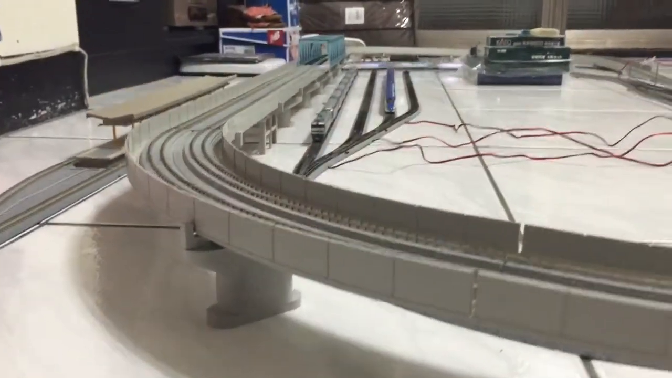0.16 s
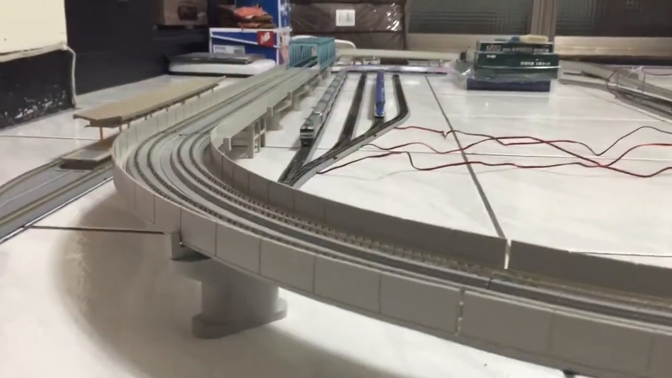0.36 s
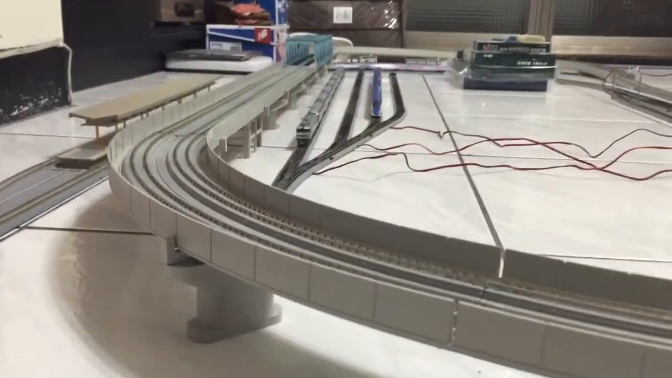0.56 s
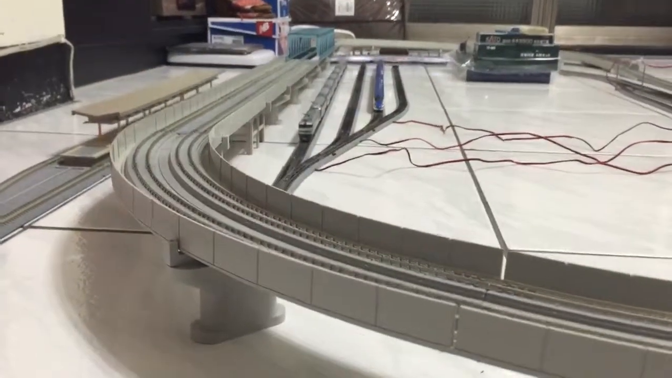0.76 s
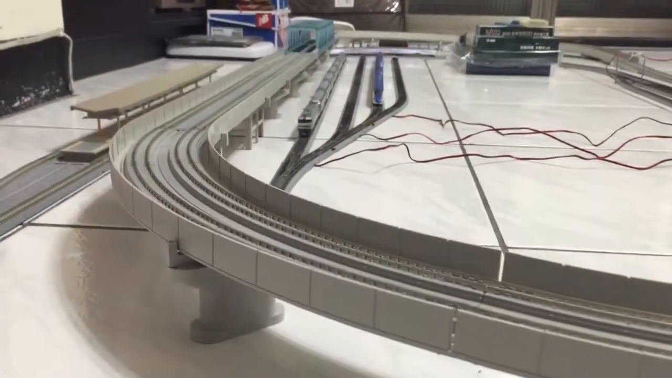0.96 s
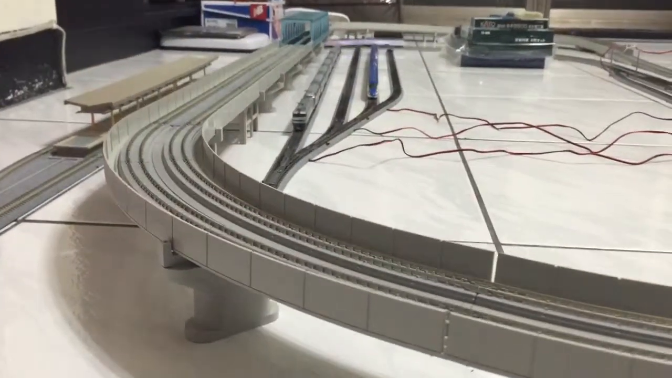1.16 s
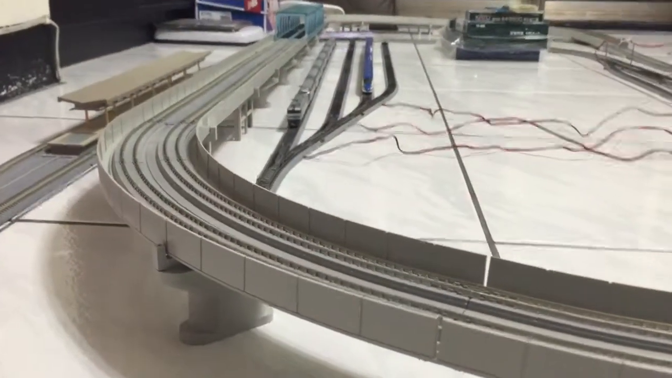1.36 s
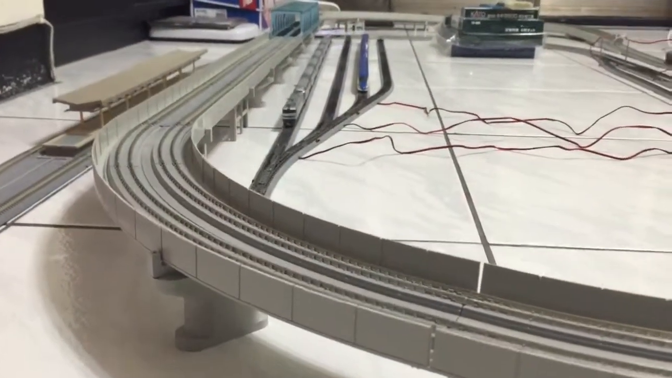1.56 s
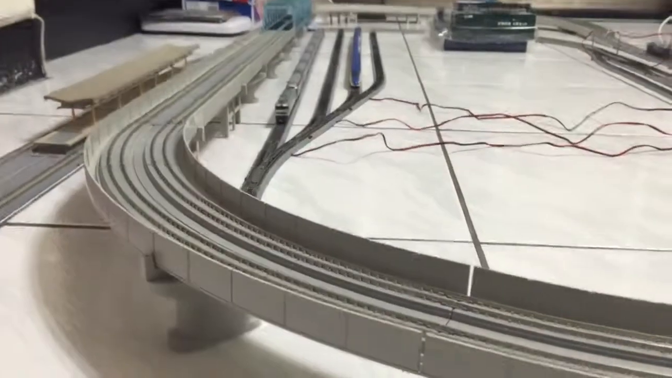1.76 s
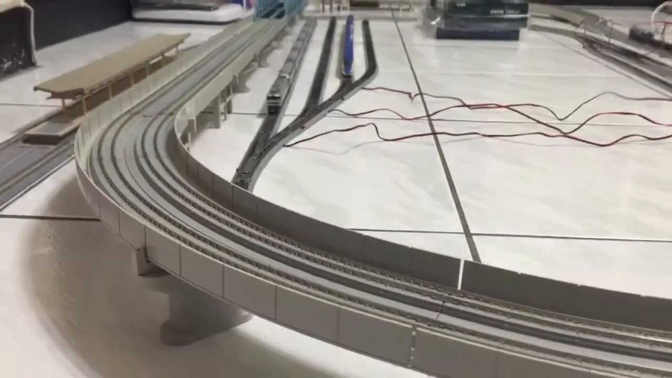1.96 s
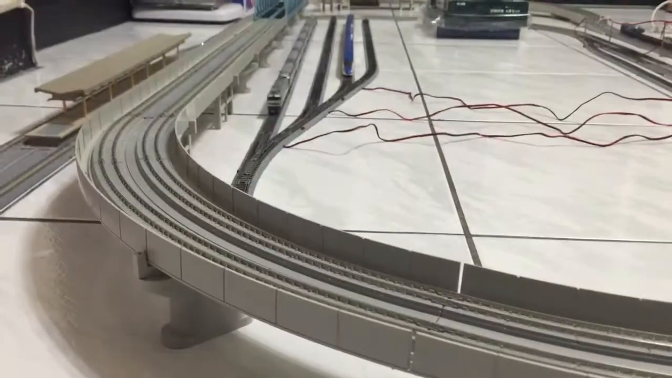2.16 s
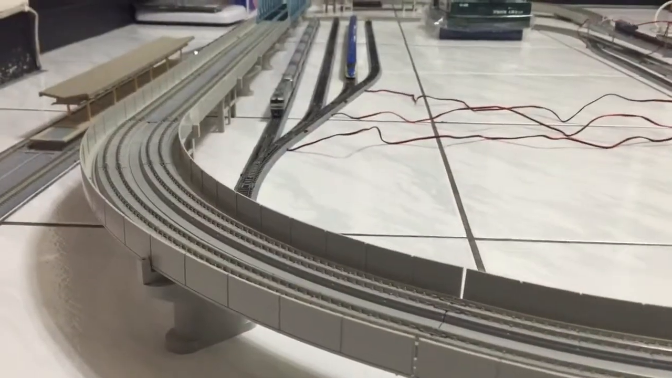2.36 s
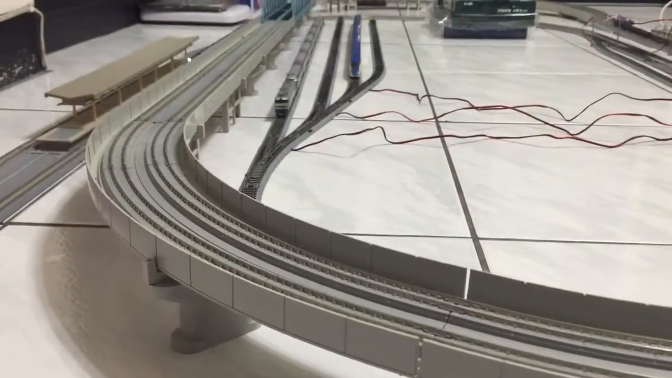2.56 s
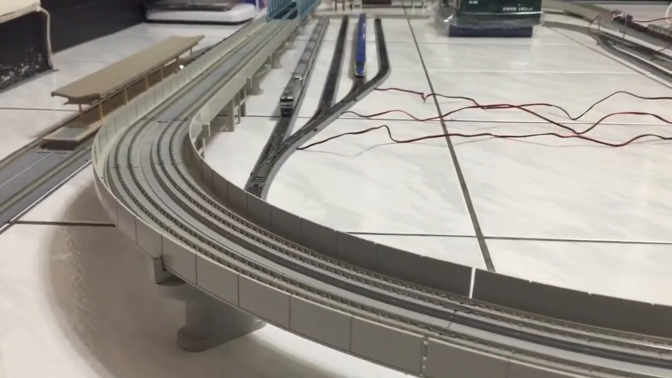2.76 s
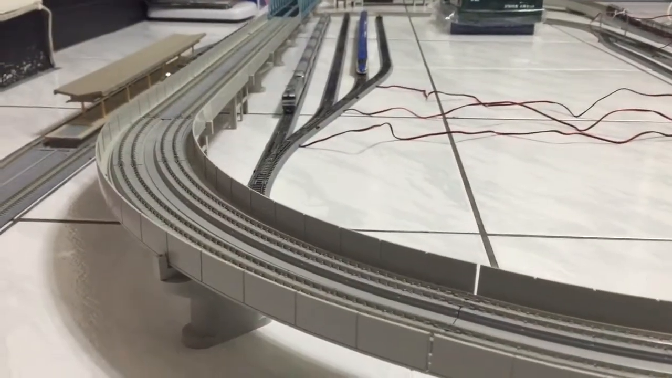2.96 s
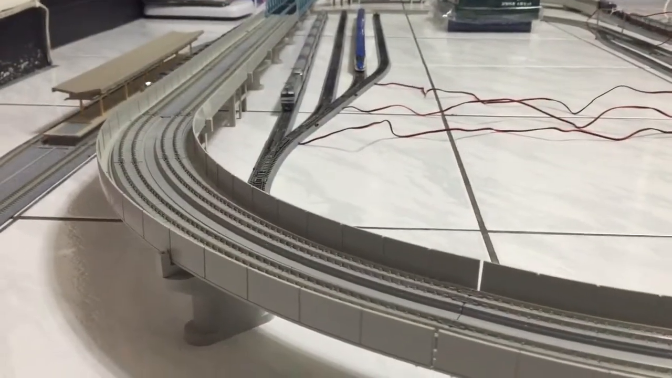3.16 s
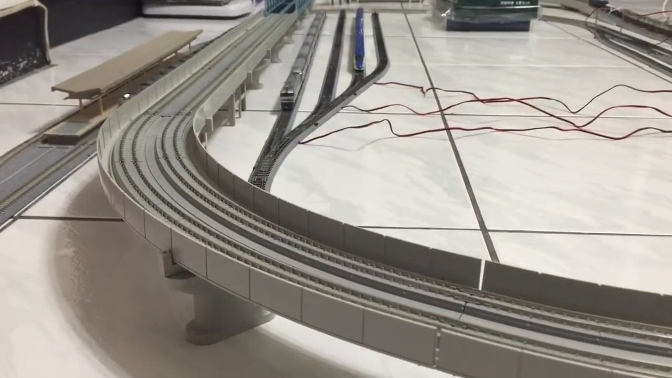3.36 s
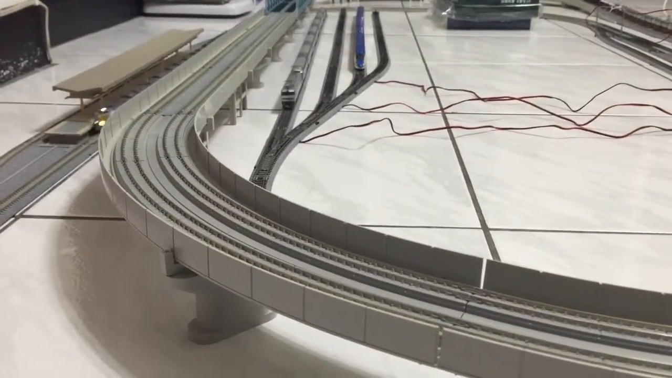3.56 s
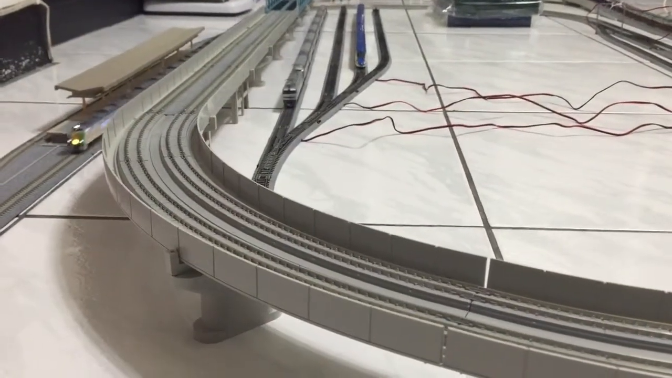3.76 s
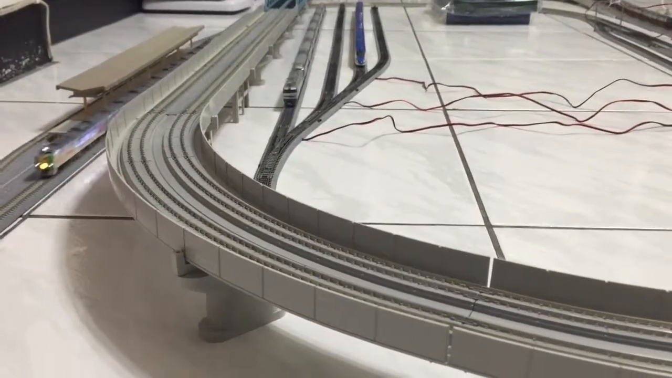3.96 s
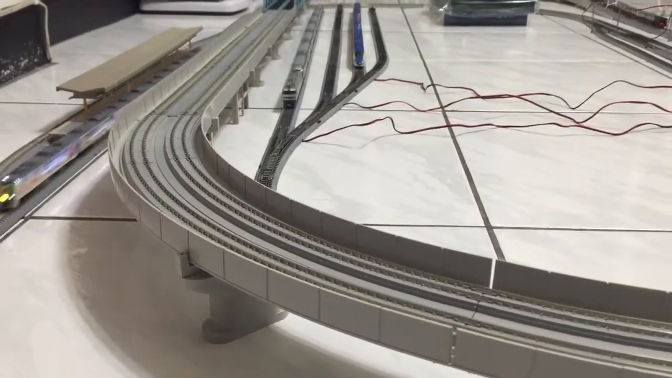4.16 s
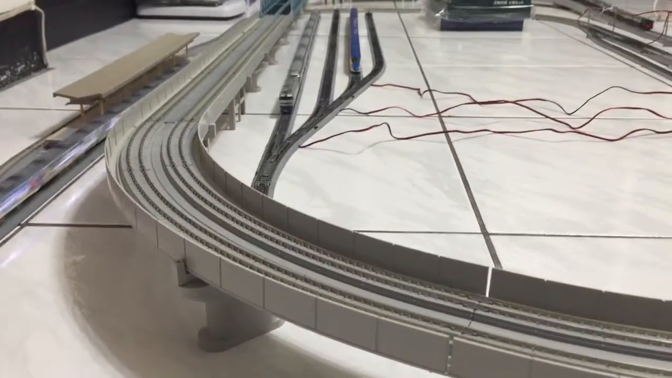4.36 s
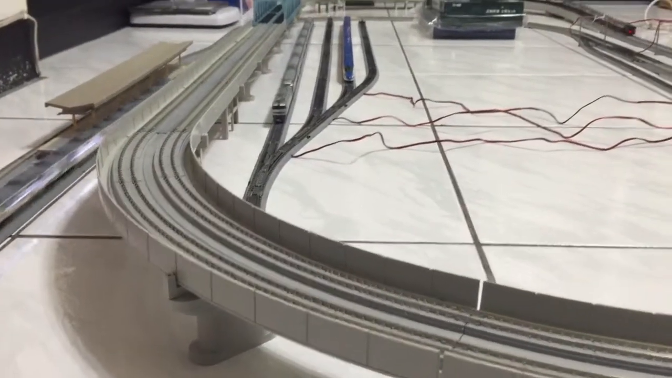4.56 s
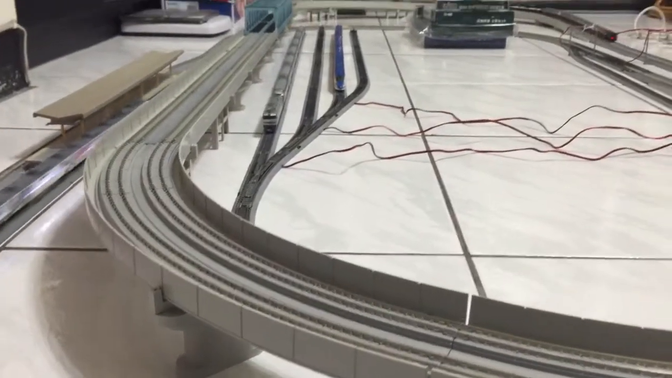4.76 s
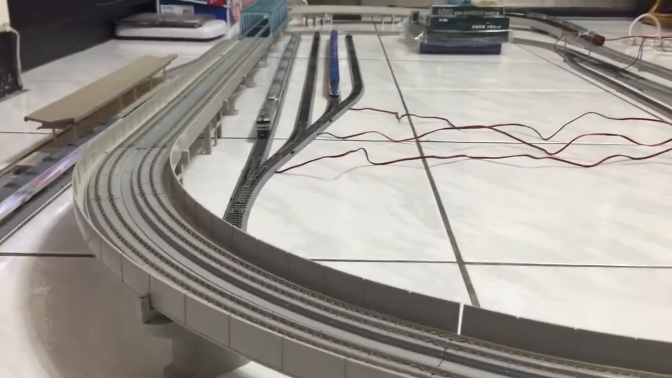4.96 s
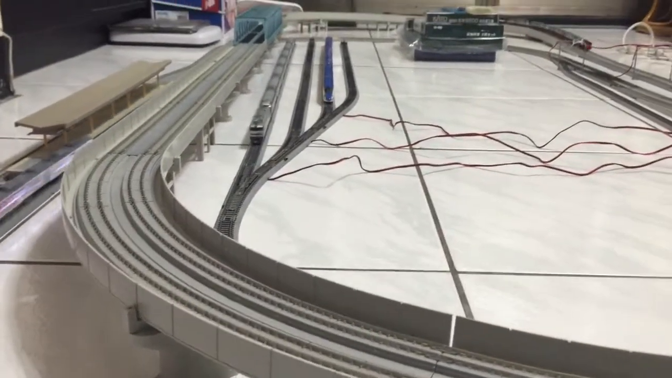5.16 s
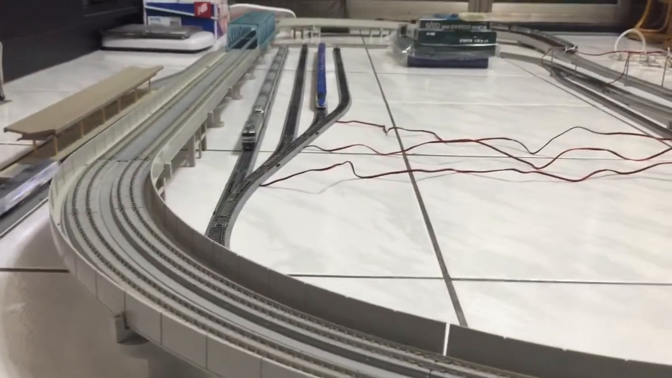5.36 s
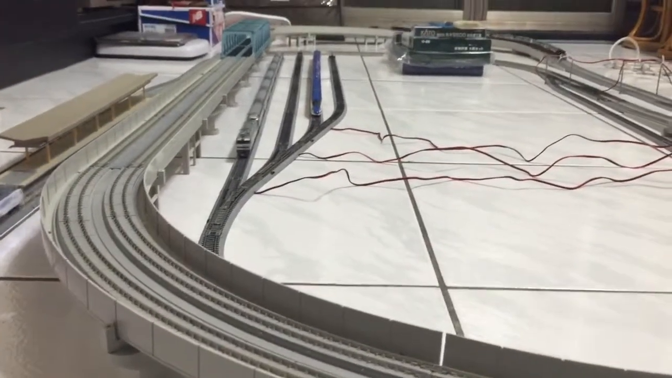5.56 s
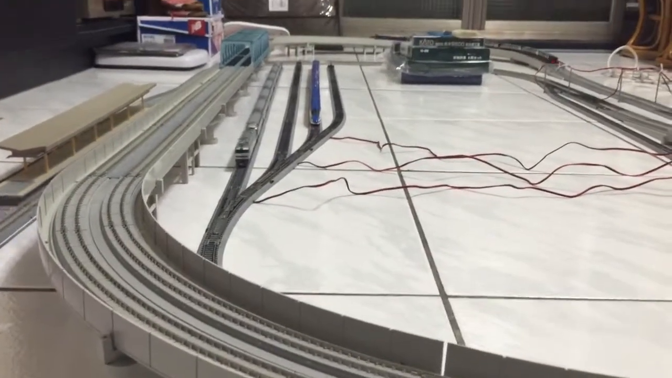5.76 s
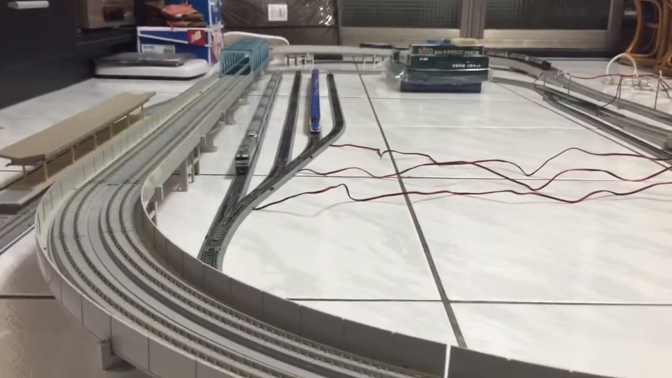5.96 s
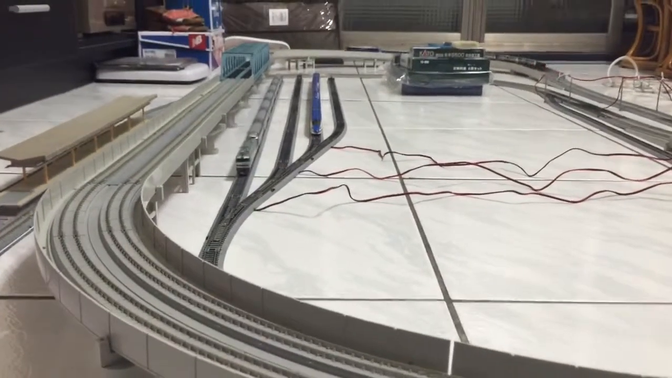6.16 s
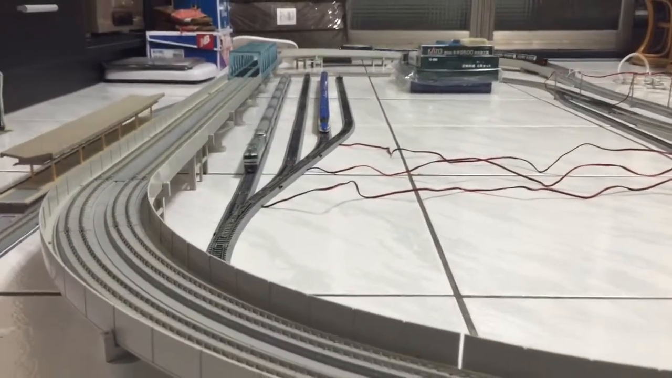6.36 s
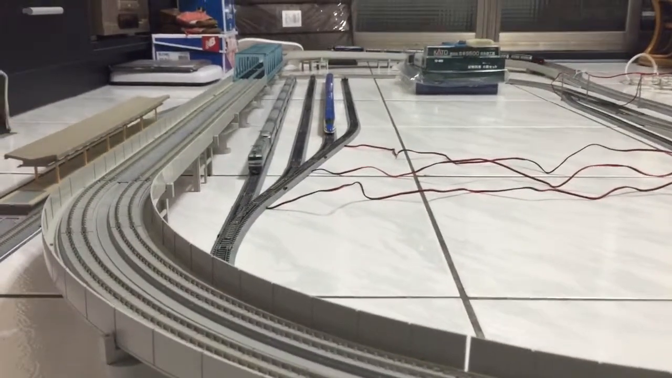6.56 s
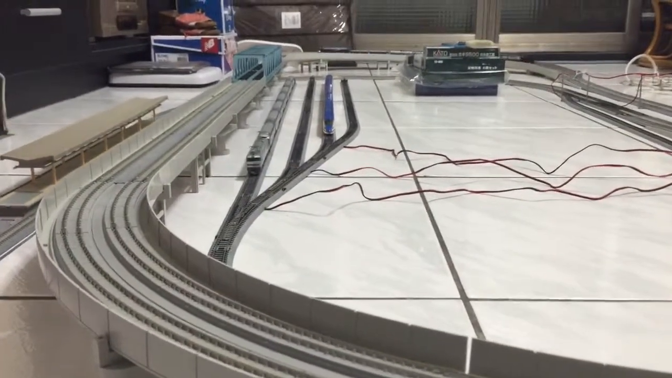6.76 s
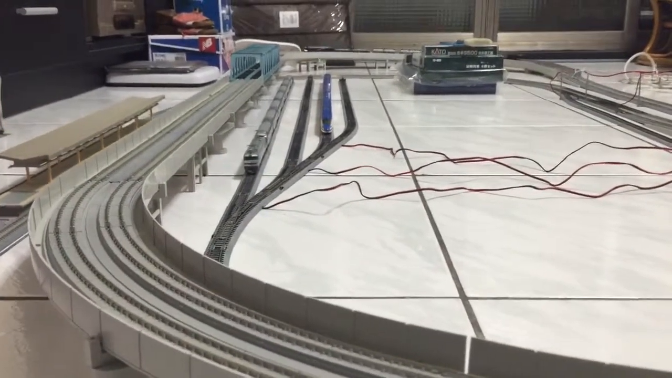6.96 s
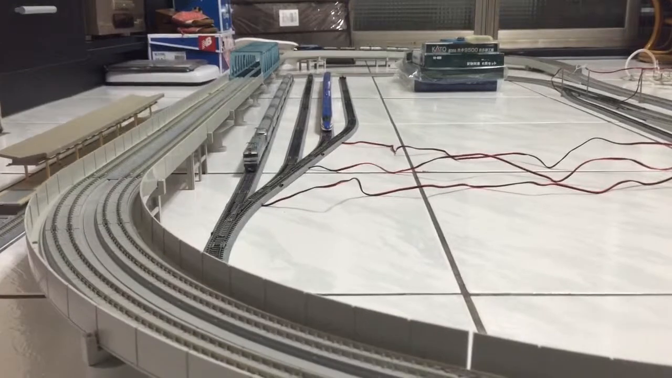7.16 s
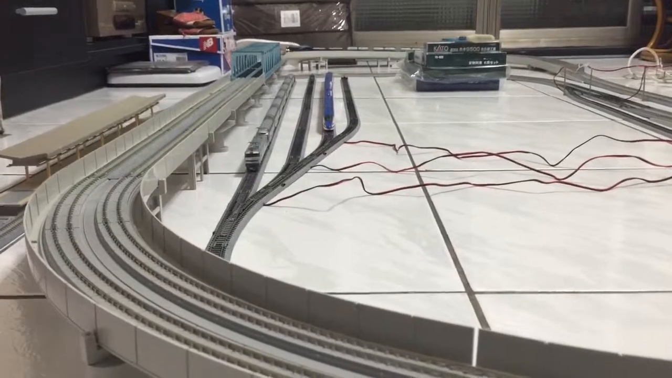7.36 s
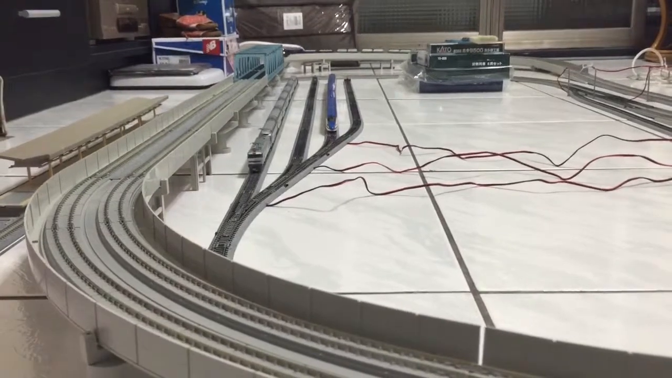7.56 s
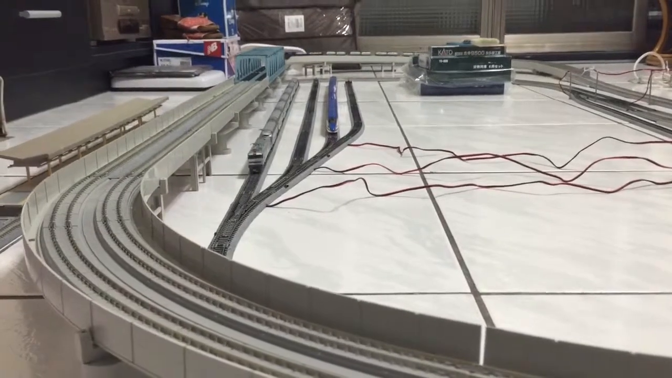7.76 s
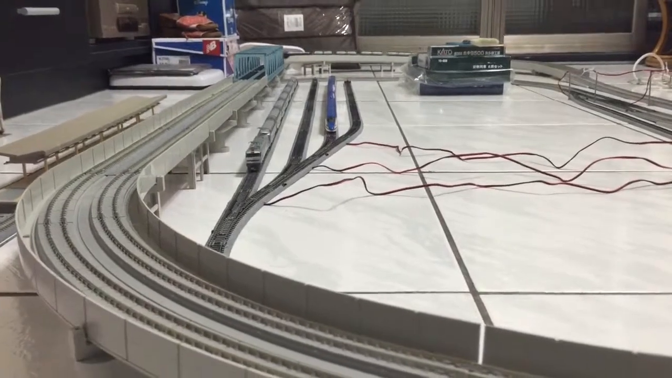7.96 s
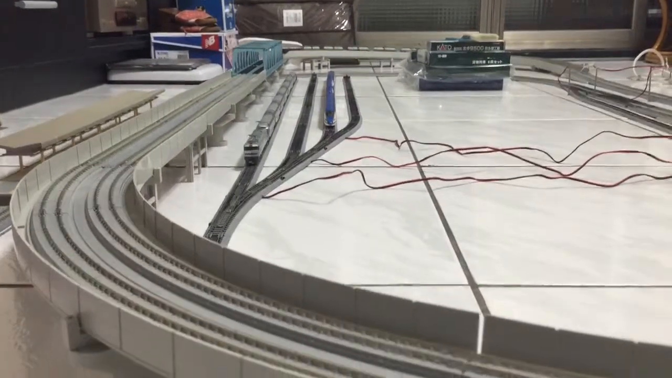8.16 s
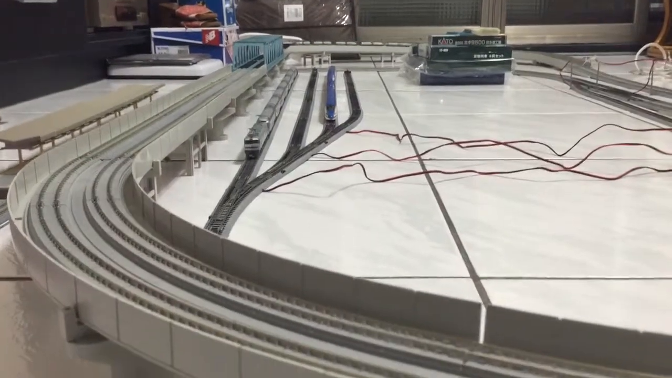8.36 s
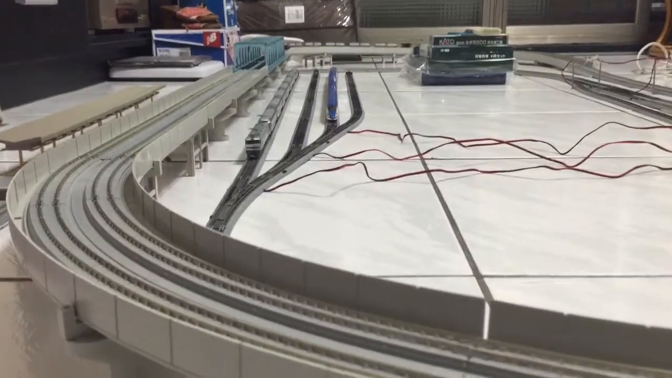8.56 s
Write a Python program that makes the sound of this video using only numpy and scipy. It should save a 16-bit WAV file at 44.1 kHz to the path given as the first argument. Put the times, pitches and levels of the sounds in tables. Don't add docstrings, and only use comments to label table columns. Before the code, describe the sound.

A small model train rolls steadily around a hollow plastic track indoors, whirring and hissing, then passes close with sharp joint rattles before easing off.

```python
import sys
import numpy as np
from scipy import signal
from scipy.fft import rfft, irfft, next_fast_len
from scipy.io import wavfile
from scipy.ndimage import uniform_filter1d

SR = 44100
rng = np.random.default_rng(int(sys.argv[2]) if len(sys.argv) > 2 else 0)


def unload_audio(sound):
    columns = np.transpose(np.atleast_2d(sound))
    steps = np.round(np.clip(columns, -1, 1) * 32767)
    wavfile.write(sys.argv[1], SR, steps.astype(np.int16))


def invert_db(x):
    u = np.asarray(x, float) / 20
    return 10 ** u


N = 379260
TIME = np.arange(N) / SR
PAD = next_fast_len(N, True)
FREQ = np.fft.rfftfreq(PAD, 1 / SR) + 1e-6
TOP_HZ = 15310
ROOM_DB = -63
THUD_DB = -46

# [f/Hz, level/dB per Hz]
ROOM_TONE = [(20, -40), (42, -30), (48, -9), (70, -1.5), (100, -7), (150, -8.5), (200, -13), (300, -19.5),
             (425, -24.5), (628, -26), (900, -24.5), (1300, -62)]
# [f/Hz, rms level/dB, share smeared by vibration/0-1, smear width/Hz]
HUM = [(59.7, -53, 0, 9), (85, -63.5, 0.9, 3.95), (119.8, -65.5, 1, 28), (139, -72, 0.94, 22),
       (167, -72.5, 0.98, 8), (178.5, -69.5, 0.4, 5.3), (238, -72, 0.07, 5.2), (297, -88, 0.9, 9.9),
       (360, -90.5, 0.75, 6)]
# [t/s, f/Hz, level/dB]
MOTOR = [
    [(0, 700, -84), (.6, 725, -84), (1.4, 736, -83), (2.2, 742, -88), (2.8, 720, -86), (3.4, 694, -89),
     (3.7, 690, -110)],
    [(5, 668, -110), (5.5, 660, -85), (6.2, 635, -85), (6.5, 635, -110)],
    [(2.2, 418, -110), (2.6, 418, -93), (4.3, 418, -92), (6.6, 415.2, -84), (7, 427.5, -75.5),
     (7.3, 418.5, -89), (7.5, 416, -70), (7.7, 418, -100), (8.6, 418, -92)],
]
# [t/s, peak level/dB, ring f/Hz]
KNOCKS = [(.08, -68, 474), (.52, -66, 770), (1.58, -66, 873), (2.36, -66, 514), (2.9, -69, 670),
          (3.36, -67, 590), (3.48, -59, 930), (4.62, -56, 940), (5.94, -66, 422), (6.08, -68, 573),
          (6.46, -49, 954), (7.26, -60, 770), (7.45, -61, 755), (7.62, -62, 596), (8.05, -71, 680),
          (8.439, -65, 392), (.4, -66, 940), (.68, -63, 950), (3.8, -61, 940), (4.3, -64, 762),
          (5.719, -45, 1720), (5.81, -44, 1940), (6.72, -41, 1577), (6.36, -55, 860), (6.8, -58, 870)]
# [t/s, peak level/dB]
JOINTS = [(4.599, -26), (4.7299, -24), (4.9246, -25), (5.3633, -24), (5.7279, -22.5), (5.932, -22),
          (6.0036, -21), (6.067, -27), (6.118, -28), (6.2711, -28), (6.552, -30), (6.6237, -22),
          (6.671, -19.5), (6.7226, -26), (6.8102, -20), (6.869, -19), (6.9634, -25), (7.0286, -23),
          (7.113, -30), (7.2384, -28), (7.3096, -16), (7.4106, -28), (7.4525, -20), (7.5068, -24),
          (7.677, -30), (7.724, -18), (8.0042, -20), (8.1227, -25), (8.164, -22), (8.2843, -26)]
# [t/s, f/Hz, level over nearness/dB]
GEARS = [(.3, 3000, -44), (1.1, 2899, -50), (1.7, 2660, -41.5), (2.2, 2500, -45), (3, 2523, -44),
         (3.5, 2690, -58), (4.5, 3300, -54), (4.72, 3346, -39.5), (5, 3340, -45.5), (5.7, 3050, -46),
         (5.85, 2950, -44.5), (6.3, 3000, -41.5), (6.5, 3090, -50), (6.7, 3120, -40), (7.35, 3113, -51),
         (7.6, 3097, -43.5), (8.1, 3154, -47), (8.3, 3050, -62)]
# [t/s, nearness level/dB, drumming into the floor level/dB, share on raised deck/0-1]
TRAIN = [(0, -2.5, -0.5, .9), (.35, -3, -0.2, 1), (1.1, -4.4, -1, 0.44), (1.9, -4.5, -2.5, 0.27),
         (2.5, -4, -1, 0.56), (3.3, -3.5, 1.5, 0.57), (3.75, -1.4, 3, .75), (4, -0.8, 1.5, .5),
         (4.55, -0.2, 0, 0.4), (4.65, 0.6, -1.4, 0.4), (5, 2, -1.8, 0), (5.4, 3, -1.5, 0.15),
         (5.65, 2.5, 0, 0.9), (5.8, 3.5, -1.5, 0.99), (6.7, 5, 0.4, 1), (7.7, 5, 0.6, 0.63),
         (8.3, 3, 2.5, 0.17), (8.6, 3, 3.5, 0)]
# [f/Hz, level/dB per Hz]
BED_TONE = [(260, -32), (450, -43.5), (694, -30), (1090, -10.5), (1580, -3.5), (2360, -3), (3130, -4.5),
            (4300, -6.5), (4930, -8.5), (5600, -17), (7280, -38), (12300, -120)]
RAIL_TONE = [(3500, -16), (4400, -4), (4910, -2.5), (6280, -3), (7100, -4), (7800, -6.5), (8700, -6.5),
             (10000, -9), (11400, -10), (12800, -11.5), (14700, -13), (15400, -16)]
BED_ZONES = [1200, 2100, 3600]
RAIL_ZONES = [7000, 12500]
# [level/dB, growth with nearness/dB per dB, share of floor drumming/dB per dB, change on the deck/dB]
BOOM = (-54.5, 1.45, 0.9, -0.2)
DRONE = (-45.5, 1.02, -0.36, 3)
SHELL = (-39, 0.89, -0.32, 0.08)
HISS = (-40, 0.8, -.15, -1.55)
FIZZ = (-46.5, 0.58, -0.6, -1.7)
# [f/Hz, width/Hz, level/dB]
CASE_DIPS = [(4910, 200, -1.5), (7550, 360, -1), (10520, 400, -4)]
# [start t/s, end t/s]
CLEARER = (2.4, 5.2)
# [t/s, low f/Hz, high f/Hz]
SPLITS = [(.81, 4650, 5680), (.972, 5680, 6890), (1.088, 7580, 10330), (1.556, 5680, 7580),
          (1.695, 4650, 6290), (2.485, 11020, 13090), (3.759, 4220, 5160), (3.759, 10330, 12200),
          (4.83, 5680, 6890), (4.902, 4650, 6290), (6.339, 8960, 11020), (7.105, 6290, 7580),
          (7.497, 5160, 6890)]


def unit(x):
    return x / np.sqrt(np.mean(x ** 2))


def walk(rate, every=1):
    k = max(int(SR / rate / every), 2)
    held = np.repeat(rng.standard_normal(N // every // k + 2), k)
    slewed = uniform_filter1d(uniform_filter1d(held, k), k)
    return unit(slewed[:len(TIME[::every])])


def smear(width_hz, every=1):
    slow = walk(width_hz, every) + 1j * walk(width_hz, every)
    return np.repeat(slow, every)[:N] / np.sqrt(2)


def colour(x, tone):
    hz, db = np.transpose(tone)
    return rfft(x, PAD) * invert_db(np.interp(np.log(FREQ), np.log(hz), db))


def shaped(x, gain):
    return irfft(rfft(x, PAD) * gain, PAD)[:N]


def bandpass(x, order, lo_hz, hi_hz):
    return signal.sosfilt(signal.butter(order, [lo_hz, hi_hz], "band", fs=SR, output="sos"), x)


def decay(t, t60):
    return np.exp(-np.log(1000) * t / t60)


def columns(table):
    s, *rest = np.transpose(table)
    return [np.interp(TIME, s, c) for c in rest]


def room():
    rumble = irfft(colour(rng.standard_normal(N), ROOM_TONE), PAD)[:N]
    out = invert_db(ROOM_DB + 1.7 * walk(8)) * unit(rumble)
    for hz, db, share, width_hz in HUM:
        share = np.clip(share, 0, 1)
        shake = np.sqrt(1 - share) + np.sqrt(share) * smear(width_hz, every=8)
        line = np.exp(2j * np.pi * (hz * TIME + rng.random()))
        out = out + invert_db(db + 3.5) * np.real(shake * line)
    return out


def motor():
    out = 0
    for stretch in MOTOR:
        hz, db = columns(stretch)
        note = np.exp(2j * np.pi * np.cumsum(hz) / SR)
        brushes = .92 + .35 * smear(16, every=8)
        out = out + invert_db(db + 3) * np.real(brushes * note)
    return out


def knocks(t60=0.31, rise_s=0.0098):
    out, t = np.zeros(N + 8000), np.arange(8000) / SR
    envelope = decay(t, t60) * (1 - np.exp(-t / rise_s))
    for s, db, hz in KNOCKS:
        i = int(s * SR)
        out[i:i + 8000] += invert_db(db) * np.sin(2 * np.pi * hz * t) * envelope
    return out[:N]


def joints(t60=0.046, share_db=-8.5, width_hz=2600, spread=0.094):
    rattles, thuds = np.zeros(N + 4000), np.zeros(N + 4000)
    t, ring = np.arange(4000) / SR, columns(GEARS)[0]
    envelope = decay(t, t60) * (1 - np.exp(-t / 0.00046))
    for s, db in JOINTS:
        i, noise = int(s * SR), rng.standard_normal(4000)
        hz = ring[i] * (1 + spread * rng.standard_normal())
        rattle = unit(bandpass(noise, 2, hz - width_hz / 2, hz + width_hz / 2))
        rattles[i:i + 4000] += invert_db(db + share_db) * rattle * envelope
        thuds[i:i + 4000] += invert_db(db) * unit(bandpass(noise, 2, 420, 900)) * decay(t, 0.065)
    bright = signal.sosfilt(signal.butter(4, 1300, "high", fs=SR, output="sos"), rattles[:N])
    return bright + invert_db(THUD_DB + columns(TRAIN)[0]) * thuds[:N]


def gears(width_hz=600):
    hz, db = columns(GEARS)
    turn = np.exp(2j * np.pi * np.cumsum(hz) / SR)
    return invert_db(db + columns(TRAIN)[0] + 1.7 * walk(30)) * np.real(turn * smear(width_hz))


def grit(rate, scatter_db, smooth):
    size_db = scatter_db * np.minimum(rng.exponential(size=N), 3)
    ticks = (rng.random(N) < rate / SR) * rng.choice([-1., 1.], N) * invert_db(size_db)
    return unit(ticks) + smooth * rng.standard_normal(N)


def parts(*answers):
    near, floor, deck = columns(TRAIN)
    return [db + growth * near + share * floor + deck_db * deck for db, growth, share, deck_db in answers]


def rolling(drive, tone, curves, zones_hz, lo_hz, patchy_db, flicker_db, count):
    every = 64
    spectrum, levels = colour(drive, tone), [c[::every] for c in curves]
    ramps, octave = np.eye(len(zones_hz)), np.log2(FREQ / lo_hz)
    zone_rms = []
    for ramp in ramps:
        weight = np.interp(np.log(FREQ), np.log(zones_hz), ramp)
        zone_rms.append(np.sqrt(2 * np.sum(weight * np.abs(spectrum) ** 2)) / N)
    out, neighbour = 0, walk(3.5, every)
    for k in range(count):
        place = np.clip(3 * octave - k, -1, 1)
        band = irfft(spectrum * np.cos(np.pi / 2 * place) ** 2, PAD)[:N]
        centre = np.log(lo_hz * 2 ** (k / 3))
        db = 0
        for ramp, level, rms in zip(ramps, levels, zone_rms):
            db = db + np.interp(centre, np.log(zones_hz), ramp) * (level - 20 * np.log10(rms))
        own = walk(3.566, every)
        db = db + patchy_db * (own + neighbour) / 2 + flicker_db * walk(22, every)
        out = out + band * np.interp(TIME, TIME[::every], invert_db(db))
        neighbour = own
    return out


def train():
    jolt = invert_db(0.14 * walk(14) + 0.23 * walk(70) + .5 * walk(260))
    bed = rolling(grit(5000, 3.6, 2.25), BED_TONE, parts(BOOM, DRONE, SHELL), BED_ZONES, 424,
                  patchy_db=0.7, flicker_db=0.66, count=13)
    rail = rolling(grit(3000, 3.3, 1.9), RAIL_TONE, parts(HISS, FIZZ), RAIL_ZONES, 3800,
                   patchy_db=0.36, flicker_db=0.34, count=8)
    low = 1 / (1 + (FREQ / 4750) ** 40)
    return jolt * (shaped(bed, np.sqrt(low)) + shaped(rail, np.sqrt(1 - low)))


def scene():
    mono = room() + motor() + knocks() + joints() + gears() + train()
    return np.array([mono, mono])


def thin_treble(x, from_hz=7000, speckle_db=1.04):
    hz, s, cells = signal.stft(x, SR, "hann", 2048)
    speckle = unit(uniform_filter1d(rng.standard_normal(cells.shape), size=7, axis=0))
    cells = cells * invert_db(speckle_db * (hz[:, None] > 300) * speckle)
    size = uniform_filter1d(np.abs(cells), size=5, axis=0)
    floor_db = np.where((s > CLEARER[0]) & (s < CLEARER[1]), -6.5, -4)
    floor = invert_db(floor_db) * np.mean(size[(hz > 10000) & (hz < TOP_HZ)], axis=0)
    kept = (size > floor) | (hz[:, None] < from_hz)
    return signal.istft(cells * kept, SR, "hann", 2048)[1][:N]


def split(mono):
    out, window = np.array([mono, mono]), np.sin(np.pi * np.arange(2048) / 2048) ** 2
    hz = np.fft.rfftfreq(2048, 1 / SR)
    for s, lo_hz, hi_hz in SPLITS:
        i, inside = int(s * SR) - 1024, (hz > lo_hz) & (hz < hi_hz)
        old = irfft(rfft(mono[i:i + 2048]) * inside)
        new = irfft(rfft(rng.standard_normal((2, 2048))) * inside)
        out[:, i:i + 2048] += window * (1.2 * np.std(old) * unit(new) - old)
    return out


def top_cut(x):
    return signal.sosfilt(signal.butter(12, 16390, fs=SR, output="sos"), x)


def record(dry):
    dips_db = sum(db * np.exp(-((FREQ - hz) / width) ** 2) for hz, width, db in CASE_DIPS)
    bass_cut = 1 / np.sqrt(1 + (46 / FREQ) ** 10)
    mono = thin_treble(shaped(dry[0], invert_db(dips_db) * bass_cut))
    mix = split(shaped(mono, FREQ < TOP_HZ))
    return top_cut(mix)


dry = scene()
out = record(dry)
unload_audio(out)
```